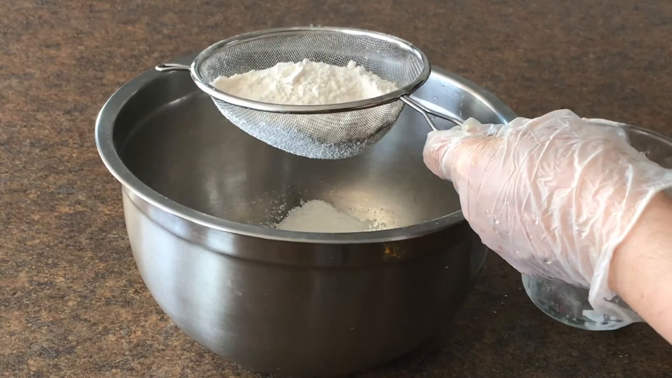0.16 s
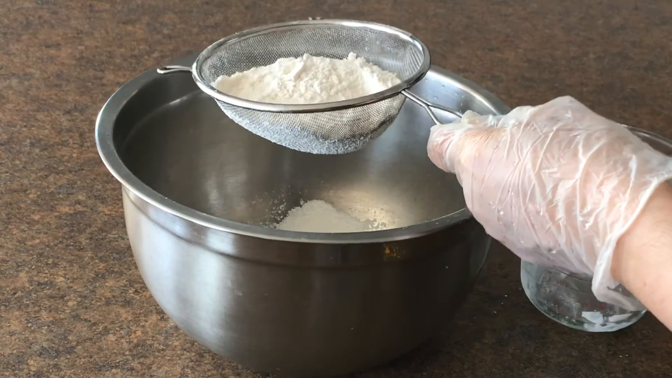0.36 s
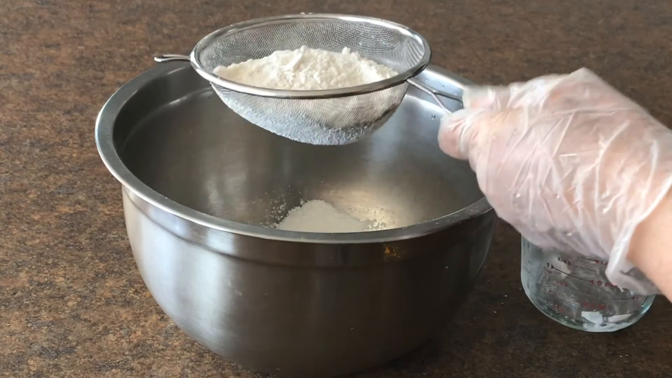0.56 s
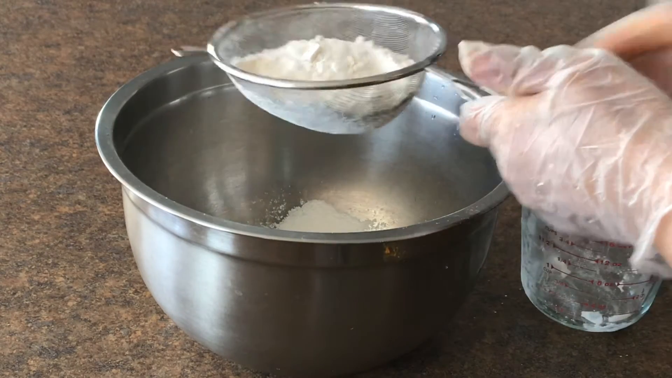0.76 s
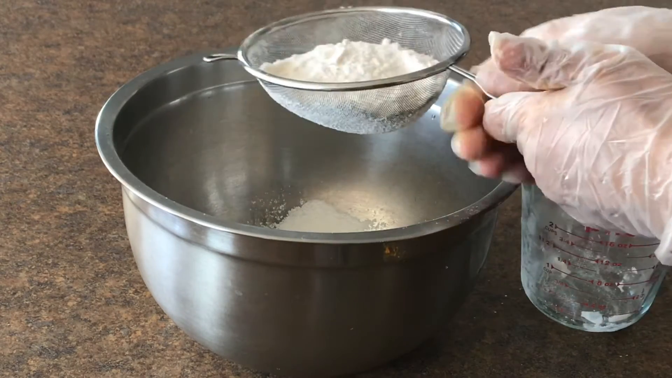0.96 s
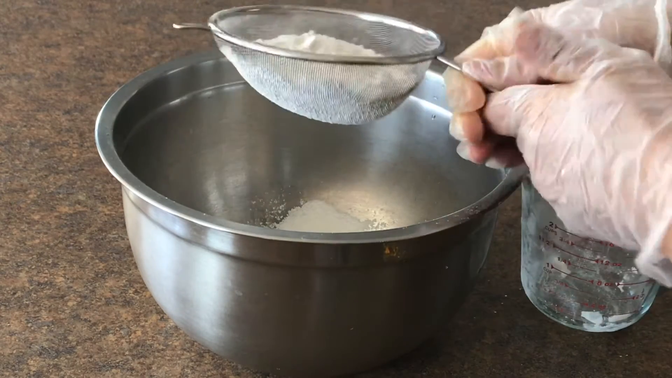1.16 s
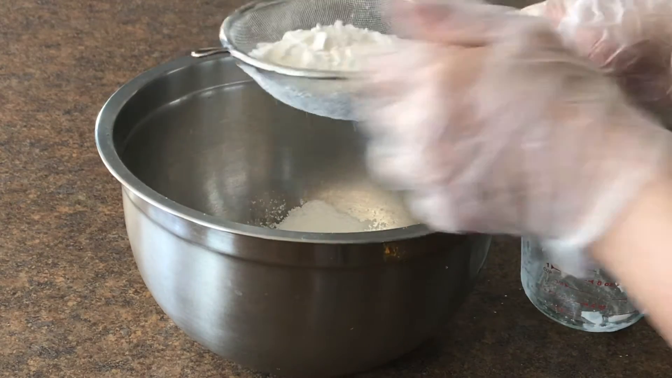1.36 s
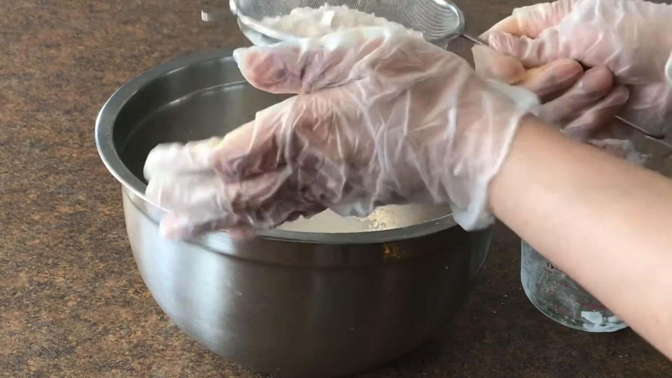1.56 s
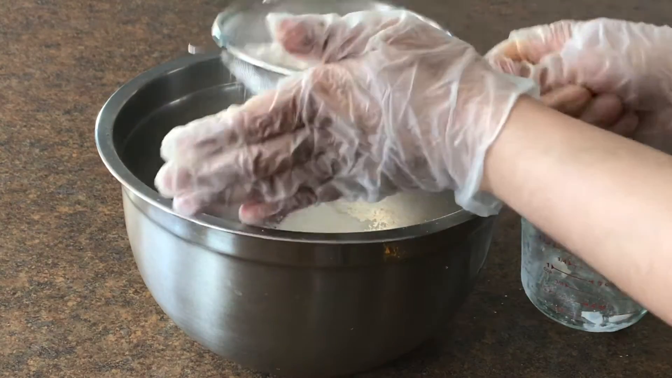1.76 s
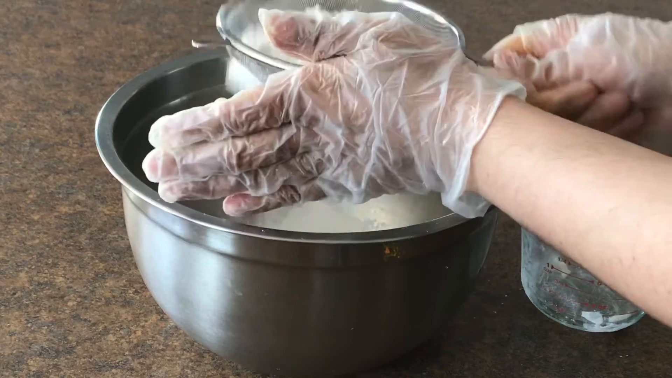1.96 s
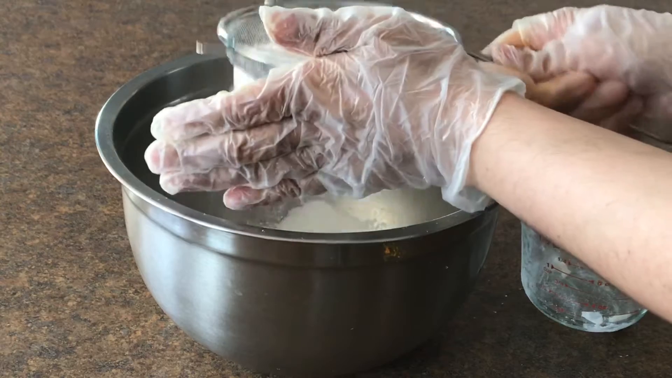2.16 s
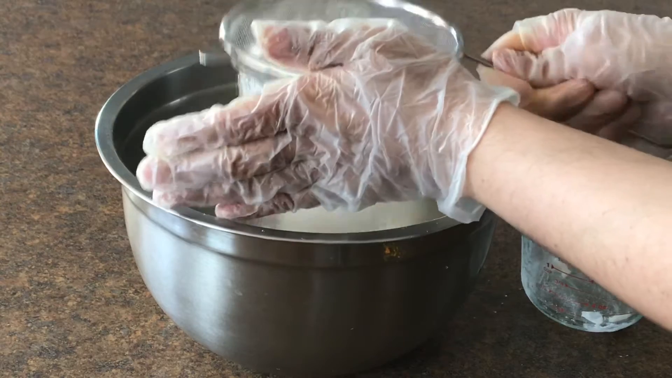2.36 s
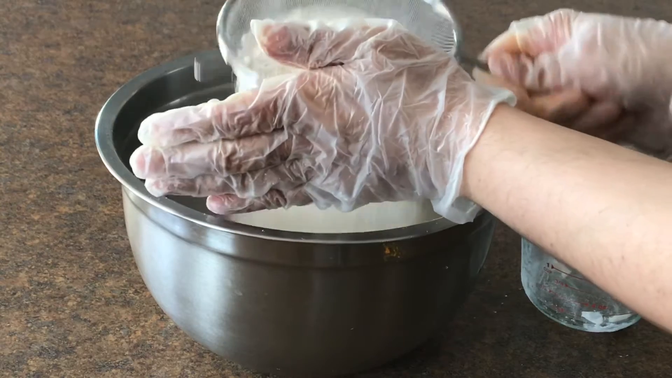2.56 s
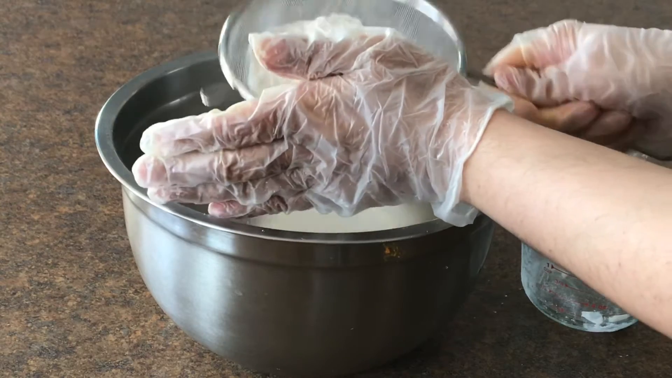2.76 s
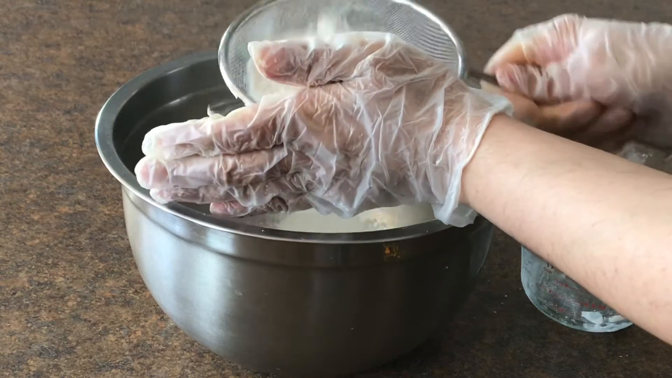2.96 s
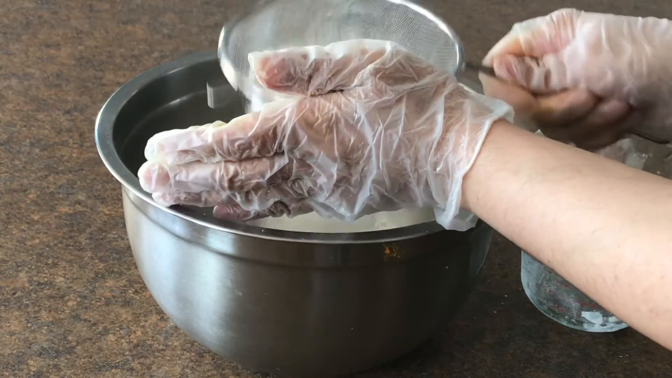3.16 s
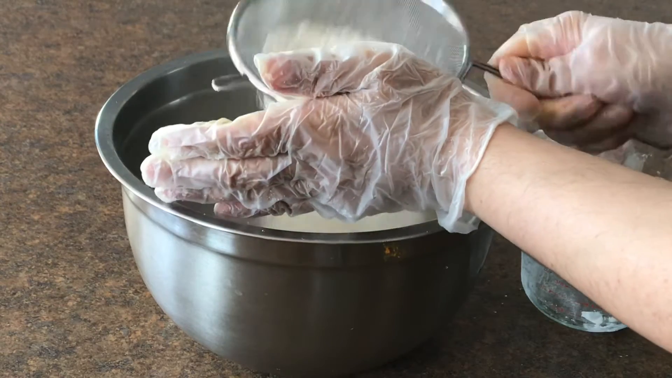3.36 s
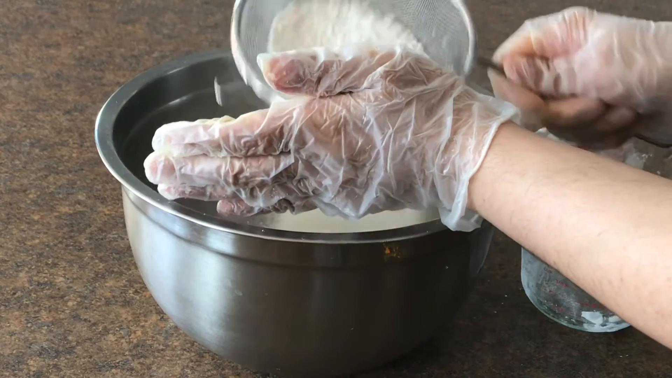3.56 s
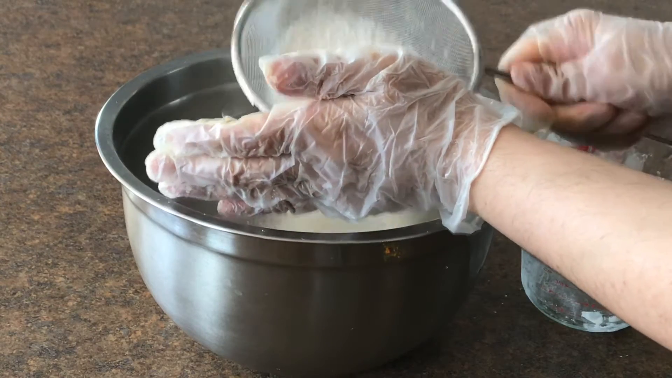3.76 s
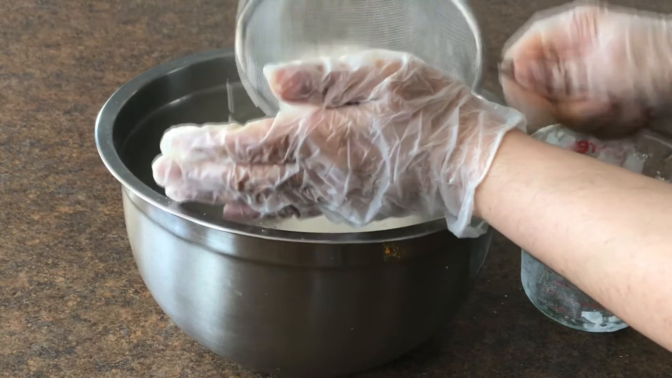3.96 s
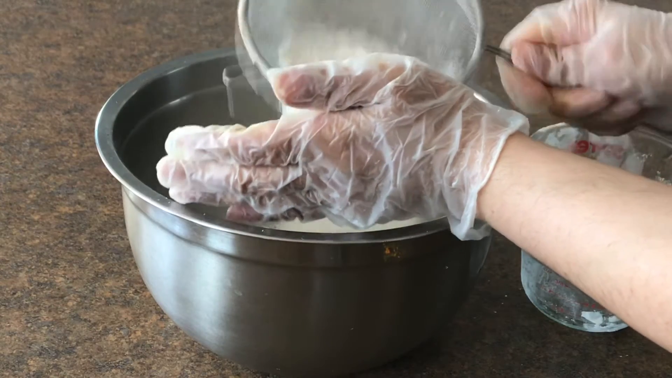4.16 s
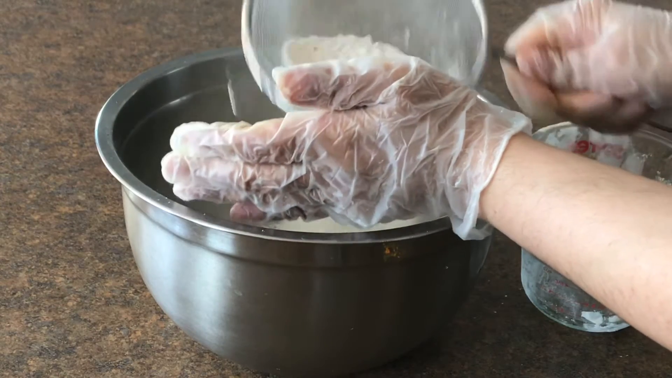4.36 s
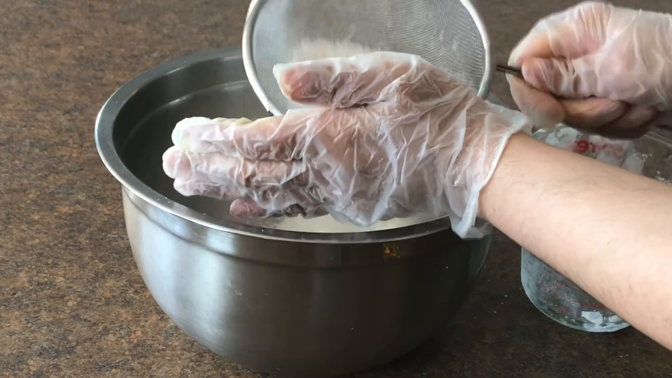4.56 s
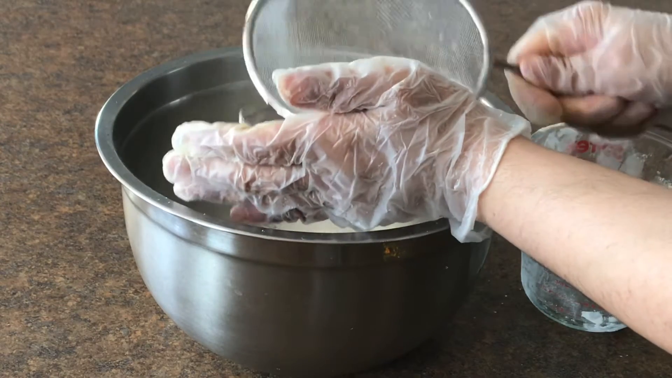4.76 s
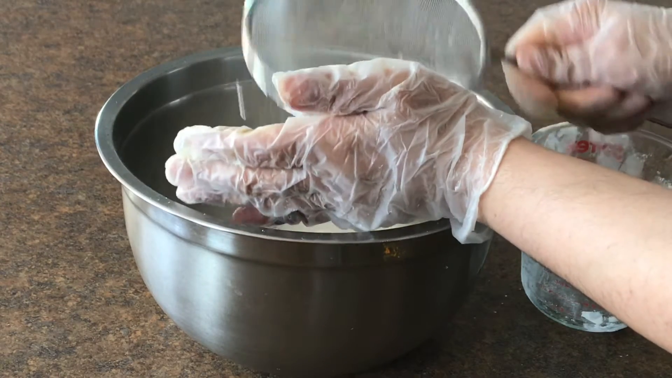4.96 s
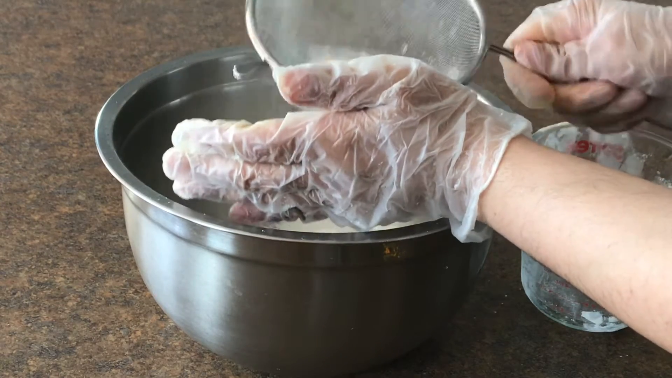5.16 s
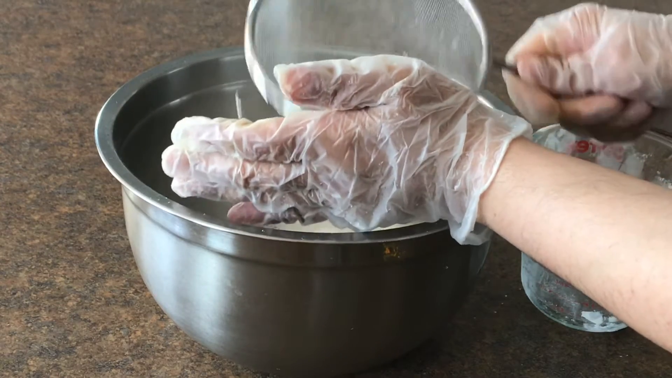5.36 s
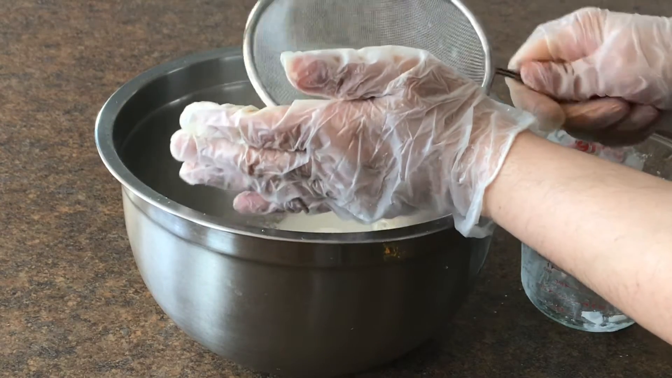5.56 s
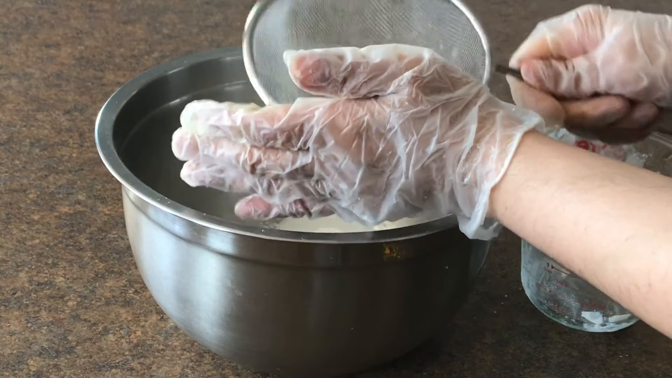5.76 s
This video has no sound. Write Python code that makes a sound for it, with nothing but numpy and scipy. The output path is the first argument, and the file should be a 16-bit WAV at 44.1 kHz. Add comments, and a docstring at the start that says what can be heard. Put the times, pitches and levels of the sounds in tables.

```python
"""A quiet kitchen, where flour is sifted over a steel bowl. A sharp knock excites the counter's modes and
the room's reverberation. Plastic gloves rub as the sieve changes hands, then its rim is tapped against a
palm six times a second. Each impact throws flour across the wire mesh, and countless grain collisions
add up to a hiss. As the sieve empties, less powder cushions it and loose lumps bounce on the bare wires."""
import sys
import numpy as np
from scipy import signal
from scipy.fft import rfft, irfft, next_fast_len
from scipy.io import wavfile
from scipy.ndimage import map_coordinates

SR = 44100
rng = np.random.default_rng(int(sys.argv[2]) if len(sys.argv) > 2 else 0)


def persist_wave(psi):
    """Save psi, clipped to +-1, as 16-bit WAV."""
    counts = np.round(np.clip(psi, -1, 1) * 32767).astype(np.int16)
    wavfile.write(sys.argv[1], SR, np.atleast_2d(counts).T)


N = 256882


def amp(db):
    """Amplitude ratio of a level in decibels."""
    return 10 ** (np.asarray(db) / 20)

def unit(x):
    """Normalisation to rms 1."""
    return x / np.sqrt(np.mean(x ** 2) + 1e-20)

def clock():
    """Uniform sampling: the time of every sample in seconds."""
    return np.arange(N) / SR

def along(points, hz):
    """Interpolation of (Hz, value) points on a logarithmic frequency axis."""
    freqs, values = np.transpose(points)
    return np.interp(np.log(hz + 1), np.log(freqs + 1), values)

def wobble(rate):
    """Smooth random modulation: a spline through rate knots a second."""
    knots = rng.standard_normal(int(N * rate / SR) + 4)
    return map_coordinates(knots, [np.arange(N) * rate / SR])

def filtered(x, response):
    """Linear filtering: the spectrum of x times a complex frequency response."""
    size = next_fast_len(N + SR // 2)
    return irfft(rfft(x, size) * response(np.fft.rfftfreq(size, 1 / SR)), size)[:N]

def causal(points):
    """Causality: a minimum-phase response through (Hz, dB) points is silent before the blow."""
    def response(hz):
        cepstrum = irfft(np.log(amp(along(points, hz))))
        half = len(cepstrum) // 2
        return np.exp(rfft(np.r_[cepstrum[0], 2 * cepstrum[1:half], np.zeros(half)]))
    return response

def grains(spectrum, clump_db=0, rate=2000):
    """Superposition: countless tiny impacts merge into coloured noise of rms 1, bunched into clumps."""
    impacts = rng.standard_normal(N) * amp(clump_db * wobble(rate))
    return unit(filtered(impacts, lambda hz: amp(along(spectrum, hz))))

def resonant(modes):
    """Forced vibration: noise drives resonances (Hz, bandwidth in Hz, dB); the sum has rms 1."""
    def response(hz):
        return sum((-1) ** k * amp(db) * 1j * hz * width / (centre ** 2 - hz ** 2 + 1j * hz * width)
                   for k, (centre, width, db) in enumerate(modes))
    return unit(filtered(rng.standard_normal(N), response))

def ring(s, hz, t60, phase=0):
    """Free vibration: a mode struck at time s decays by 60 dB in t60 seconds."""
    t = np.clip(clock()[:2 * SR] - s, 0, None)
    envelope = np.exp(-np.log(1000) * t / t60) * (1 - np.exp(-t / 0.00063))
    return np.pad(np.sin(2 * np.pi * hz * t + phase) * envelope, (0, N - 2 * SR))

def swells(times, levels_db, scales_s, shape):
    """Incoherent addition: the envelope of overlapping events whose powers add."""
    power, t = np.zeros(N), clock()
    for s, db, scale in np.broadcast(times, levels_db, scales_s):
        near = slice(max(int(s * SR) - SR // 8, 0), int(s * SR) + SR // 4)
        power[near] += (amp(db) * shape((t[near] - s) / max(scale, 1e-4))) ** 2
    return np.sqrt(power)

def shower(u):
    """Rise and relaxation: thrown powder starts at u = 0, is thickest at 1 and settles."""
    u = np.maximum(u, 0)
    return u * np.exp(1 - u)

def burst(u, lead=1.78, thinning=0.57):
    """Spread of arrival times in a grain cloud: a quick front, a peak at u = 0, then stragglers."""
    front = .5 + .5 * np.tanh((u + lead) / 1.3)
    return front * np.exp(np.minimum(u / 5, -thinning * u))

def stroke(s, rise_s, fade_s, roundness=1.4):
    """Envelope of sliding friction: it rises 20 dB in rise_s, peaks at s and falls 20 dB in fade_s."""
    t = clock() - s
    return amp(-20 * np.maximum(-t / rise_s, t / fade_s) ** roundness)


# Spectrum of the room's air. Each row: frequency in Hz, relative level in dB.
AIR_SPECTRUM = [(20, -35), (40, -3), (62, 2.5), (100, -4), (200, -3), (400, -13.5), (700, -15.5),
                (1500, -15.5), (3500, -20.5), (6000, -26), (16000, -30)]
def air():
    """Ambient noise: a steady floor, strongest in the bass."""
    return amp(-68) * grains(AIR_SPECTRUM)

# The kitchen's reverberation. Each row: frequency in Hz, time to decay by 60 dB in seconds.
KITCHEN_T60 = [(60, 0.63), (300, .52), (1000, 0.6), (2500, 0.43), (6000, .35), (15000, 0.32)]
def room(x, build_s):
    """Reverberation: a diffuse field about as strong as x builds up and decays, the treble first."""
    hz, t, noise = signal.stft(rng.standard_normal(SR), SR, nperseg=256)
    decay = np.exp(-np.log(1000) * t / along(KITCHEN_T60, hz)[:, None]) * (1 - np.exp(-t / build_s))
    tail = signal.istft(noise * decay, SR, nperseg=256)[1]
    return signal.fftconvolve(x, tail / np.linalg.norm(tail))[:N]

# Rumble of the moving hands. Each row: time in seconds, relative level in dB.
RUMBLE_LEVELS = [(.45, -69.5), (1.1, -71), (1.3, -68.5), (1.55, -75.5), (1.8, -68), (2.6, -69), (3.45, -67),
                 (3.75, -76), (4.5, -72.5), (5.82, -74.5)]
def hand_rumble():
    """Amplitude modulation: a dull noise swells and fades as the hands move."""
    level_db = np.interp(clock(), *np.transpose(RUMBLE_LEVELS), left=-120, right=-120)
    spectrum = [(80, -27), (200, -4), (290, 0), (450, -4.5), (650, -15), (2000, -32.5)]
    return amp(level_db - 3) * grains(spectrum)

# Soft bumps. Each row: start in seconds, level in dB, frequency in Hz, 60 dB decay time in seconds.
GRIP_BUMPS = [(.301, -48.5, 148.5, 0.21), (.301, -49.5, 225, 0.11), (0.868, -39, 2600, .006),
              (1.287, -36.5, 1720, 0.0063), (1.287, -42, 690, 0.0068)]
def grip_bumps():
    """Impulse response: each bump of the changing grip leaves a damped vibration."""
    return sum(amp(db) * ring(s, hz, t60) for s, db, hz, t60 in GRIP_BUMPS)

def handle():
    """Frictional excitation: the wire handle sings at its resonances as it slides through the fingers."""
    sliding = amp(-65.5) * stroke(1.39, rise_s=.125, fade_s=.38)
    return sliding * resonant([(445, 35, 0), (2220, 90, 2), (3570, 320, -10)])

# Spectra of rubbing and of crinkling plastic. Each row: frequency in Hz, relative level in dB.
RUB_SPECTRUM = [(300, -29), (800, -12.5), (1500, -3), (2500, -3.5), (3400, 1.5), (4500, -10), (7000, -10.5),
                (16000, -24)]
CRINKLE_SPECTRUM = [(1500, -34), (3500, -2), (5500, 1.5), (6600, -0.5), (7800, -5.5), (9300, -0.5),
                    (10500, -4), (11700, 0.5), (14000, -1), (16000, -3)]
# Glove strokes. Each row: peak time, rise and fade in seconds, relative rub and crinkle levels in dB.
GLOVE_STROKES = [(.42, .15, .15, -76, -77), (.472, .033, .17, -62, -61.5), (.6, .07, .07, -71.5, -65.5),
                 (.806, .008, .015, -62, -80), (.858, .035, .15, -54.5, -62),
                 (1.116, .115, .032, -52, -51.5), (1.202, .042, .055, -51, -47.5),
                 (1.29, .06, .42, -67.5, -68.5), (1.526, .06, .05, -73, -76), (2.535, .022, .012, -60, -72),
                 (3.515, .06, .05, -65.5, -85)]
def gloves():
    """Sliding friction: plastic rubs and crinkles against the other glove or the sieve."""
    rub = sum(amp(db) * stroke(s, rise, fade) for s, rise, fade, db, _ in GLOVE_STROKES)
    crinkle = sum(amp(db) * stroke(s, rise, fade) for s, rise, fade, _, db in GLOVE_STROKES)
    return (amp(-1.3) * rub * grains(RUB_SPECTRUM, clump_db=3.0, rate=710)
            + amp(1.6) * crinkle * grains(CRINKLE_SPECTRUM, clump_db=2.7, rate=1200))

# Spectra of the blow and of its echo. Each row: frequency in Hz, relative level in dB.
BLOW_SPECTRUM = [(30, -39), (80, -5), (150, 4), (260, 7), (480, -4.5), (900, -1), (1400, -11.5),
                 (2100, -13), (3200, -23.5), (5500, -35.5), (9000, -52), (16000, -66)]
ECHO_SPECTRUM = [(30, -15), (70, -4.5), (160, -0.5), (420, -2.5), (800, -10), (1400, -16.5), (2200, -18),
                 (3200, -32.5), (5500, -40.5), (9000, -53), (16000, -63)]
# Modes of the counter and what stands on it.
# Each row: frequency in Hz, relative level in dB, 60 dB decay time in seconds.
COUNTER_MODES = [(61, -19, .5), (86.3, -19, .5), (125.3, -11.5, .5), (151.5, -9.5, 0.34), (181, -12, 0.59),
                 (216.4, -13, 0.63), (251, -14, 0.58), (307.4, -14, 0.45), (388.6, -8, 0.31),
                 (430.6, -7.5, 0.38), (523, -19, 0.44), (593, -15, 0.42), (754, -15, .4), (818, -27, 0.33),
                 (873, -18, 0.33), (967, -18.5, 0.37), (1170, -21, 0.34), (1194, -17, .22)]
def knock(s=.0503, blow_db=15, modes_db=-29.0, echo_db=13.0, dispersion=0.054):
    """Dispersion: high bending waves outrun low ones, so a blow sweeps down as counter and room ring."""
    hit = np.zeros(N)
    hit[round(s * SR)] = 1
    sweep = filtered(hit, lambda hz: np.exp(-4j * np.pi * dispersion * np.sqrt(hz)))
    wave = amp(blow_db) * filtered(sweep, causal(BLOW_SPECTRUM))
    modes = sum(amp(modes_db + db) * ring(s + 0.00302, hz, t60, rng.uniform(0, 2 * np.pi))
                for hz, db, t60 in COUNTER_MODES)
    radiated = amp(echo_db) * filtered(sweep, causal(ECHO_SPECTRUM))
    return wave + modes + room(radiated, build_s=0.0017)

# Flour left in the sieve. Each row: time in seconds, share of a full load from 0 to 1.
FLOUR_LOAD = [(1.7, 1), (3.04, .92), (3.2, .6), (4.0, .4), (4.2, .16), (4.66, .09), (4.82, 0), (5.82, .03)]
def load(s):
    """Mass loading: the share of the flour lying on the mesh at time s."""
    return np.clip(np.interp(s, *np.transpose(FLOUR_LOAD)), 0, 1)

# Spectrum of the struck mesh. Each row: frequency in Hz, relative level in dB.
MESH_SPECTRUM = [(1500, -34), (3500, -15.5), (5000, -10), (6200, -1), (7600, -2.5), (8300, -2.5),
                 (9800, -0.5), (10500, -7), (11500, -3), (13000, -3), (14500, -7), (16000, -7.5)]
def wires(clump_db=2.5, patch_db=1.5):
    """Timbre depends on the point of impact: each spot that grit hits rings brighter or duller; rms 1."""
    grit = grains(MESH_SPECTRUM, clump_db, rate=3000)
    bright = filtered(grit, lambda hz: hz > 10400)
    tilt = amp(patch_db * wobble(rate=60))
    return unit((grit - bright) / tilt + bright * tilt)

# Modes of the wire rim. Each row: frequency in Hz, bandwidth in Hz, relative level in dB.
RIM_MODES = [(926, 155, -2.5), (1580, 390, 1), (3300, 370, 0), (4310, 240, -7)]
def rim():
    """Damping: the palm broadens the resonances of the rim."""
    return resonant(RIM_MODES)

# The rim meets the palm. Each row: time in seconds, force level in dB, rim level in dB,
# wait until the backswing turns in seconds, level of the lumps thrown by that turn in dB.
PALM_TAPS = [(1.7128, -39.5, -54.5, .118, -64), (1.8733, -35, -57, .104, -56),
             (2.057, -38.5, -61.5, .106, -57), (2.2154, -43.5, -57.5, .102, -60),
             (2.3887, -37.5, -58, .111, -55), (2.5496, -38, -59, .119, -56),
             (2.7142, -37.5, -60, .11, -49.5), (2.8703, -37.5, -61, .113, -51),
             (3.0423, -40.5, -62, .103, -49), (3.1923, -38, -56.5, .114, -51),
             (3.3667, -38.5, -59, .103, -50.5), (3.528, -37, -58, .1, -48.5),
             (3.698, -39.5, -60, .102, -47), (3.8592, -41.5, -63.5, .104, -49.5),
             (4.0257, -42, -68, .102, -52), (4.157, -41, -60.5, .102, -45.5),
             (4.3259, -39, -60.5, .102, -42.5), (4.493, -38.5, -59.5, .0965, -43.5),
             (4.6602, -36.5, -57.5, .0986, -40.5), (4.8207, -37, -54.5, .105, -43.5),
             (4.9888, -37, -56.5, .1058, -41.5), (5.1595, -39, -58, .109, -43.5),
             (5.3236, -37, -58, .115, -46), (5.4904, -37.3, -59.5, .1116, -43.5),
             (5.6595, -38, -56.5, .1145, -48)]
def taps(slide_lead_s=0.014, slide_s=0.0049, mesh_s=.0027, rim_s=0.004, thump_s=0.0062):
    """Inertia: the flour slides across the sieve, the rim stops on the palm and the load hits the mesh."""
    s, _, rim_db, _, _ = np.transpose(PALM_TAPS)
    slide = swells(s - slide_lead_s, tap_db(-34, 9.5), slide_s, burst) * grains(RUB_SPECTRUM, clump_db=1)
    mesh = swells(s, tap_db(0.3, -7.3), mesh_s, burst) * wires(clump_db=4.5)
    ringing = swells(s, rim_db, rim_s, burst) * rim()
    thump = swells(s - thump_s, tap_db(-27, -6), thump_s, shower)
    palm = thump * grains([(40, -14), (90, -3), (350, 3), (700, -8), (2000, -35)])
    return slide + mesh + ringing + palm

def tap_db(empty_db, load_db):
    """Proportional response: each tap's force level plus empty_db, plus load_db times the load."""
    s, force_db = np.transpose(PALM_TAPS)[:2]
    return force_db + empty_db + load_db * load(s)

# Big lumps that land out of step. Each row: time in seconds, level in dB, half-width in seconds.
STRAY_LANDINGS = [(1.9027, -47.5, .0006), (2.341, -52, .0004), (2.963, -48.5, .00054), (3.03, -47.5, .0014),
                  (3.2514, -53, .002), (3.422, -50, .0012), (3.5605, -43, .00064), (3.5823, -49, .0023),
                  (3.8264, -51, .003), (3.9303, -51, .0015), (3.9933, -46, .0025), (4.0559, -46.5, .0005),
                  (4.096, -50, .0022), (4.2079, -38.5, .00055)]
# The two bounces after a tap. Each row: delay in seconds, level over the force in an empty sieve in dB,
# change with a full load in dB, half-width in seconds.
BOUNCES = [(.029, -7.3, -15, .0022), (.055, -10, -15, .0026)]
def lumps(click_s=.00025, backswing_s=.002, scatter_s=0.001, small_s=0.0008, small_lead_s=0.024):
    """Inelastic collisions: lumps click on bare wires, bounce twice and land again as the swing turns."""
    s, _, _, wait, turn_db = np.transpose(PALM_TAPS)
    landings = [swells(s, tap_db(6.8, -60), click_s, burst),
                swells(s + wait, turn_db, backswing_s, burst),
                swells(*np.transpose(STRAY_LANDINGS), burst)]
    for delay, empty_db, load_db, width in BOUNCES:
        times = s + delay + scatter_s * rng.standard_normal(len(s))
        landings.append(swells(times, tap_db(empty_db, load_db), width, burst))
    # a small lump rolls off just ahead of the turn, the earlier the higher the heap
    landings.append(swells(s + wait - small_lead_s * load(s), -51.5 - 3 * load(s), small_s, burst))
    return np.linalg.norm(landings, axis=0) * (wires() + amp(-19) * rim())

def crumbs(flow, per_second=110, scatter_db=3, decay_s=0.00084):
    """Poisson process: single crumbs tick on the wires at random, louder when more flour is moving."""
    lands = rng.random(N) < per_second / SR
    sizes = lands * amp(scatter_db * np.clip(rng.standard_normal(N), -2, 2))
    decay = np.exp(-np.arange(SR // 200) / (SR * decay_s))
    return flow * signal.fftconvolve(sizes, decay)[:N] * wires()

# Spectrum of the fine powder. Each row: frequency in Hz, relative level in dB.
POWDER_SPECTRUM = [(400, -40), (1000, -17.5), (1600, -16.5), (2500, -16.5), (3500, -6), (4800, -6),
                   (6300, 3), (9800, -2.5), (10400, -10), (11500, -1.5), (16000, -4)]
def flour(fall_s=0.024, trickle_db=-65.5, crumb_db=4.8, bare_db=5):
    """Granular flow: powder showers through the mesh after each tap and trickles between taps."""
    s, t = np.transpose(PALM_TAPS)[0], clock()
    falling = swells(s, tap_db(-21.3, -9), fall_s, shower)
    shifting = (t > s[0]) * amp(trickle_db - 5.7 * load(t))
    powder = (amp(-0.5) * falling * grains(POWDER_SPECTRUM, clump_db=5.0, rate=900)
              + amp(-3) * shifting * grains(POWDER_SPECTRUM, clump_db=5.5, rate=630))
    bare = amp(bare_db * (.5 - load(t)))  # less flour cushions the wires as it runs out
    return powder + amp(crumb_db) * bare * crumbs(np.hypot(falling, shifting))


def scene():
    """Superposition: the knock, the close sounds and their faint reverberation add to the quiet air."""
    hands = gloves() + handle() + grip_bumps() + hand_rumble()
    close = hands + taps() + flour() + lumps()
    return (knock() + close + amp(-12.3) * room(close, build_s=0.0016) + air())[None]

def record(dry):
    """Band limiting: an ideal low-pass filter removes the highest treble."""
    return filtered(dry[0], lambda hz: hz < 15950)[None]


dry = scene()
out = record(dry)
persist_wave(out)
```